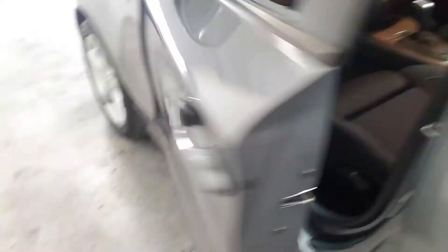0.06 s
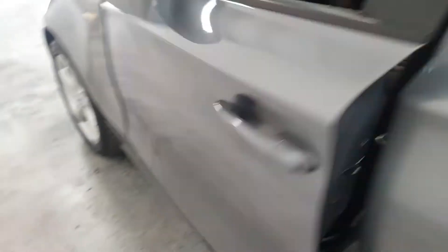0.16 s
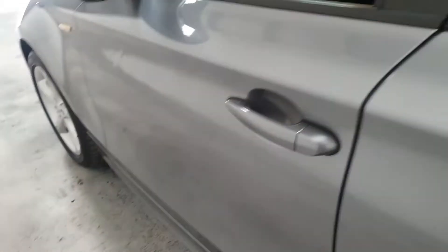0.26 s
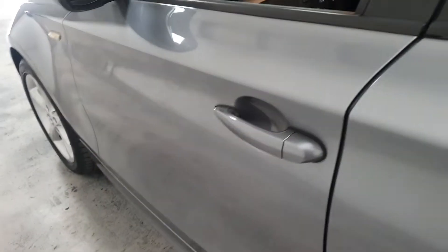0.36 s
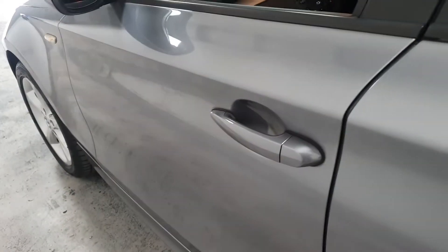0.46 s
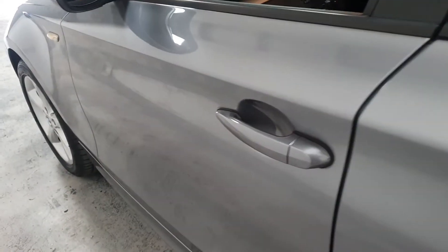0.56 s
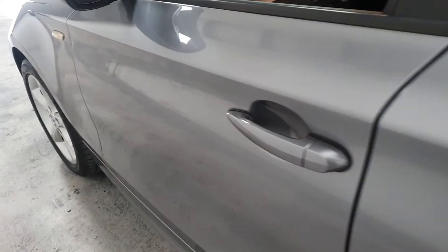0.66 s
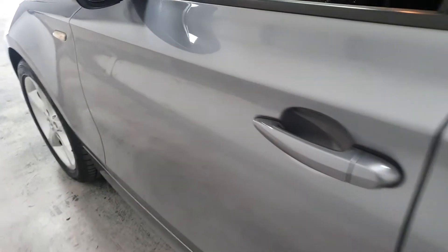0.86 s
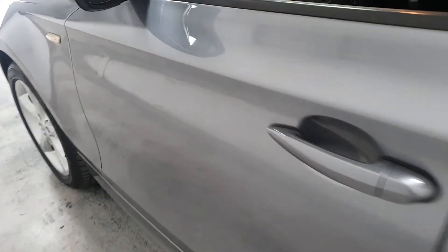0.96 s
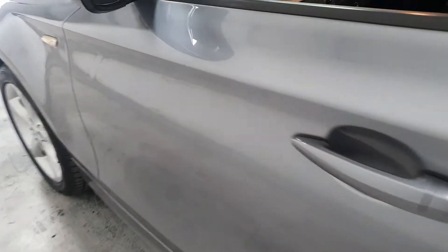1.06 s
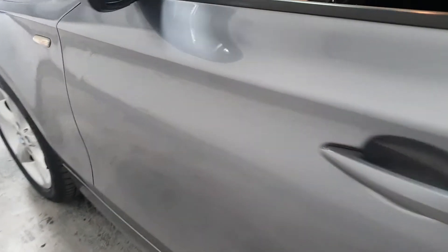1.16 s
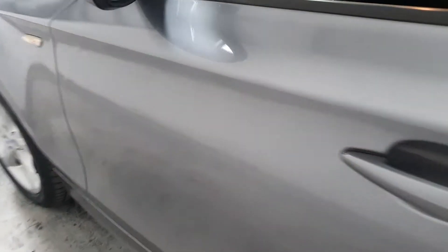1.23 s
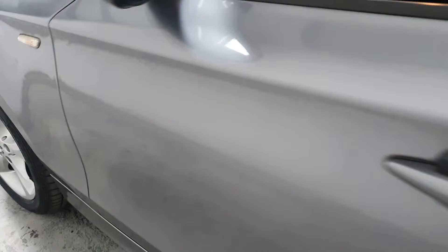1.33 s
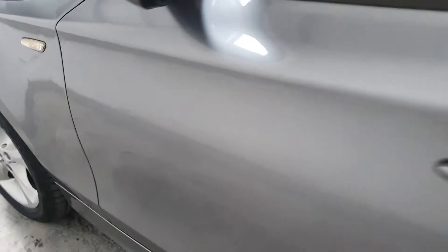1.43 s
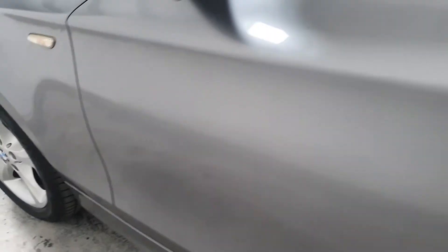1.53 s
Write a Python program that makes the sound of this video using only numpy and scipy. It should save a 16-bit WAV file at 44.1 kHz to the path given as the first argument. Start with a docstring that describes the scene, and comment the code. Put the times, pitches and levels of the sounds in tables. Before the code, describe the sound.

A car door slams shut with a solid metallic thunk, echoing through a bare garage

```python
"""Car door slammed in an echoing garage

A car door is swung shut in a bare garage, an arm's length from a hand-held microphone.
Shaped noise makes the rushing scuff of the swing; short ringing tones and noise bursts make the latch clack.
Slower tones and noise make the door boom, shudder and rattle, and fading noise bands make the hall ring out.
Underneath are a faint wavering hum, rumble and hiss, with soft handling knocks and a sleeve rustle."""
import sys
import numpy as np
from scipy import signal
from scipy.fft import rfft, irfft
from scipy.io import wavfile
from scipy.ndimage import uniform_filter1d

SR = 44100
rng = np.random.default_rng(int(sys.argv[2]) if len(sys.argv) > 2 else 0)


def output_pcm(signal):
    """Save a mono or channel-first signal as 16-bit PCM at the path in sys.argv[1].

    Samples are clipped to [-1, 1] before scaling.
    """
    pcm = np.clip(np.atleast_2d(signal).T, -1, 1) * 32767
    wavfile.write(sys.argv[1], SR, np.round(pcm).astype(np.int16))


N = 68355  # length in samples


def undb(db):
    """Turn decibels into a gain."""
    return 10 ** (np.asarray(db) / 20)


def clock():
    """Time of every sample, in seconds."""
    return np.arange(N) / SR


def unit(x):
    """Scale a sound to an rms of 1."""
    return x / np.sqrt(np.mean(x ** 2))


def fade(start, t60):
    """Start suddenly, then die away exponentially, falling 60 dB in t60 seconds."""
    age = clock() - start
    return (age >= 0) * np.exp(-np.log(1000) * np.maximum(age, 0) / t60)


def grow(start, build_s):
    """Rise from 0 towards 1, quickly at first and then ever more slowly."""
    return 1 - np.exp(-np.maximum(clock() - start, 0) / build_s)


def curve(points):
    """Gain that follows points of (seconds, dB)."""
    seconds, db = np.array(points).T
    return undb(np.interp(clock(), seconds, db))


def freqs():
    """Frequency of every spectral bin in Hz, kept at 1 or more so logarithms work."""
    return np.maximum(np.arange(N // 2 + 1) * SR / N, 1)


def colour(x, points):
    """Shape the spectrum of noise with points of (Hz, dB), then scale it to an rms of 1."""
    hz, db = np.array(points).T
    gain = undb(np.interp(np.log(freqs()), np.log(hz), db))
    return unit(irfft(rfft(x) * gain, N))


BASS_LIKENESS, ALIKE_HZ = 0.992, 800  # how alike left and right are in the bass; where this fades
TREBLE_HZ, TREBLE_PAN_DB = 4500, -1  # around this pitch the sound leans right (minus means right)


def diffuse():
    """Stereo noise from all around: left and right agree in the bass and differ in the treble."""
    mid, side = rfft(rng.standard_normal((2, N)))
    alike = BASS_LIKENESS / (1 + (freqs() / ALIKE_HZ) ** 2)
    lean_db = TREBLE_PAN_DB * np.exp(-np.log2(freqs() / TREBLE_HZ) ** 2)
    sign = np.array([[1], [-1]])  # left, right
    spectrum = mid * np.sqrt(1 + alike) + sign * side * np.sqrt(1 - alike)
    return unit(irfft(spectrum * undb(sign * lean_db / 2), N))


def gritty(grain_db, size=24):
    """Diffuse noise broken into tiny grains, each "size" samples long, of uneven strength."""
    noise = diffuse()
    grains = undb(grain_db * rng.standard_normal(N // size + 1))
    return noise * np.repeat(grains, size)[:N]


def ring(modes, start, flip=1):
    """Fading tones struck at one moment; with flip -1 neighbours swing in opposite directions."""
    out = 0
    for k, (hz, db, t60) in enumerate(modes):
        tone = np.sin(2 * np.pi * hz * (clock() - start))
        out = out + flip ** k * undb(db) * fade(start, t60) * tone
    return out


def convolve(x, response):
    """Pass stereo sound through a response."""
    return signal.fftconvolve(x, response, axes=1)[:, :N]


# Background rumble level. Each row: time in seconds, level in dB.
FLOOR_LEVEL = [(1.2, -63), (1.4, -71), (1.55, -62)]
# Background rumble colour. Each row: frequency in Hz, relative level in dB.
FLOOR = [(25, -12), (60, 5), (110, -5.5), (250, -18.5), (500, -25), (900, -22), (1500, -35.5),
         (4000, -54.5)]
# Background hiss colour. Each row: frequency in Hz, relative level in dB.
HISS = [(500, 3), (2500, -3.5), (6500, -1.5), (8500, -10.5), (16000, -13.5)]
# Hum level. Each row: time in seconds, rms level in dB.
HUM_LEVEL = [(0, -64), (.9, -71), (1.15, -68.5), (1.4, -82), (1.55, -67)]
HISS_DB = -80.5
HUM_HZ, HUM_WAVER = 168, .025  # average pitch, and its typical drift as a fraction


def background():
    """Rumble and hiss are coloured noise; the hum is a sine whose pitch wavers at random."""
    waver = colour(rng.standard_normal(N), [(3, 2.5), (30, -50), (300, -120)])
    pitch_hz = HUM_HZ * (1 + HUM_WAVER * waver)
    hum = np.sqrt(2) * np.sin(2 * np.pi * np.cumsum(pitch_hz) / SR)
    rumble = curve(FLOOR_LEVEL) * colour(diffuse(), FLOOR)
    hiss = undb(HISS_DB) * colour(diffuse(), HISS)
    return rumble + hiss + hum * curve(HUM_LEVEL)


# Loudness of the swing's scuff. Each row: time in seconds, level in dB.
SCUFF_LEVEL = [(0, -27.5), (.03, -28.5), (.075, -27), (.1, -30), (.15, -36), (.21, -39), (.3, -88.5)]
# Colour of the swing's scuff. Each row: frequency in Hz, relative level in dB.
SCUFF = [(30, -6.5), (70, 10.5), (130, -15.5), (280, -15), (480, -9.5), (760, -9.5), (900, 1.5), (1100, -1),
         (1600, 1), (1950, 3.5), (2350, -4), (3500, -4), (6000, -9.5), (8200, -21.5), (15000, -25.5)]
SCUFF_GRAIN_DB = 0.5  # unevenness of the grains


def scuff():
    """Fine-grained rubbing noise that goes with the swing and dies as the door shuts."""
    return colour(gritty(SCUFF_GRAIN_DB), SCUFF) * curve(SCUFF_LEVEL)


# Echo bands of the garage.
# Each row: centre in Hz, relative level in dB, time to fall 60 dB in seconds (before the build-up).
HALL = [(40, -8, 0.95), (80, -7, .72), (160, -5, 0.56), (310, -2.5, 0.8357), (570, -3.5, 1.193),
        (1200, -6.5, 1.6), (2500, -8.5, 1.54), (4400, -9.5, 1.4), (6500, -8, 1.2), (9000, -8.5, 0.82),
        (14800, -11.5, 0.26)]
HALL_DELAY_S, HALL_BUILD_S = 0.017, 0.018  # wait before the echoes, and how gradually they build


def hall():
    """Response of the garage: dense echoes build up, then each band dies at its own rate."""
    noise, out = rfft(diffuse()), 0
    centres = np.log([row[0] for row in HALL])
    build = grow(HALL_DELAY_S, HALL_BUILD_S)
    for (hz, db, t60), pick in zip(HALL, np.eye(len(HALL))):
        shape = build * fade(0, t60)
        # Each band blends smoothly into its neighbours.
        band = irfft(noise * np.interp(np.log(freqs()), centres, pick), N)
        out = out + undb(db) * band * shape / np.sqrt(np.sum(shape ** 2))
    return out


# Strikes of the latch. Each row: start in seconds, relative level of ring and clack in dB,
# relative level of the crack in dB, left minus right in dB.
STRIKES = [(0.2187, -0.5, -28.5, -3), (0.2203, -1, -24, 0), (.2230, -2, -31, 4.5), (0.229, -18.5, -7, -8),
           (.2313, -12.5, 1, -6), (0.2354, -19.5, -10.5, 1), (0.2533, -22, -15, 0)]
# Ringing tones of the latch and door edge.
# Each row: frequency in Hz, relative level in dB, time to fall 60 dB in seconds.
LATCH_MODES = [(466, -17, 0.033), (657.3, -13.5, 0.017), (946.6, -22.5, 0.04), (1126.2, -16.5, 0.046),
               (1322, -13.5, .03), (1650, -8, 0.025), (2207, -15.5, 0.027), (2700.4, -11, 0.025),
               (3089, -11.5, .02), (4009.5, -0.5, 0.01464), (4650, -16.5, 0.0047)]
# The many weaker tones of the whole door, heard as one broad clack.
# Each row: frequency in Hz, relative level in dB.
CLACK = [(150, -2.5), (300, 8.5), (500, 6.5), (900, 1), (1500, -8), (2600, -3), (4300, -6), (5400, -13),
         (6500, -26.5), (9000, -43.5)]
# Metal-on-metal crack. Each row: frequency in Hz, relative level in dB.
CRACK = [(300, 1), (1200, 10), (3000, -4.5), (5000, -2.5), (6700, -3), (8000, -12.5), (12000, -14.5),
         (16000, -13)]
LATCH_DB, CLACK_DB, CRACK_DB = 0.5, -14, -14  # added to the strike levels
CLACK_T60_S, CRACK_T60_S = .018, .011
LEFT_LAG_S = .0001  # the latch ring and the body boom reach the left side later
LATCH_TOP_HZ = 5313  # the damped metal gives little above this
LEFT_SHADE_HZ = 2606  # the far side of the microphone hears the latch duller


def latch():
    """The claw hits the striker, snaps over and settles; each strike rings, clacks and cracks."""
    metal, clack, crack = 0, 0, 0
    broad, sharp = colour(diffuse(), CLACK), colour(diffuse(), CRACK)
    for s, ring_db, crack_db, pan_db in STRIKES:
        pan = undb(np.array([[pan_db], [-pan_db]]) / 2)
        tones = np.array([ring(LATCH_MODES, s + lag, flip=-1) for lag in (LEFT_LAG_S, 0)])
        metal = metal + pan * undb(LATCH_DB + ring_db) * tones
        clack = clack + pan * undb(CLACK_DB + ring_db) * broad * fade(s, CLACK_T60_S)
        crack = crack + pan * undb(CRACK_DB + crack_db) * sharp * fade(s, CRACK_T60_S)
    left = signal.lfilter(*signal.butter(1, LEFT_SHADE_HZ, fs=SR), metal[0])
    metal = np.array([left, metal[1]])
    soften = signal.butter(6, LATCH_TOP_HZ, fs=SR, output="sos")
    return signal.sosfilt(soften, metal), signal.sosfilt(soften, clack), crack


# Colour of the trim and window buzz. Each row: frequency in Hz, relative level in dB.
RATTLE = [(200, -2), (500, 9), (850, -3.5), (1300, -1.5), (2000, -3), (4300, -3.5), (6000, -13),
          (8000, -23.5), (16000, -25)]
RATTLE_S, RATTLE_DB = .257, -18.5  # moment and level of the strongest buzz
RATTLE_RISE_S, RATTLE_T60_S = 0.02, 0.17


def rattle():
    """Loose trim buzzes as grainy noise, from the first latch strike, most as the door bottoms out."""
    early = np.minimum(clock() - RATTLE_S, 0)
    shape = np.where(early < 0, np.exp(early / RATTLE_RISE_S), fade(RATTLE_S, RATTLE_T60_S))
    started = clock() > STRIKES[0][0]
    return undb(RATTLE_DB) * colour(gritty(grain_db=4.0), RATTLE) * shape * started


# The door pressing into its seals.
# Each row: middle of the push in seconds, relative level in dB, length of the push in seconds.
BLOWS = [(0.2346, -9.5, 0.0015), (0.2417, -4, 0.0031), (.2570, 2.5, 0.0041)]
# Booming tones of the door skin and cabin.
# Each row: frequency in Hz, relative level in dB, time to fall 60 dB in seconds.
BODY_MODES = [(55.23, -21, 0.46), (84.2, -3, 0.052), (121.35, -17.5, 0.079), (167.47, -11.5, 0.16),
              (208.4, -12, 0.12), (256.58, -17, 0.13), (311.5, -11.5, 0.16), (414.6, -17.5, 0.2),
              (489, -18.5, 0.37), (578, -18.5, .16), (654, -18, 0.16)]


def body():
    """Soft pushes of the rubber seals set the door skin and cabin booming."""
    out = 0
    for s, db, contact in BLOWS:
        # Half a sine: the push grows and lets go smoothly.
        push = np.sin(np.pi * np.minimum(clock() / contact, 1))
        boom = ring(BODY_MODES, s - contact / 2)
        out = out - undb(db) * signal.fftconvolve(boom, push / push.sum())[:N]
    left = np.interp(clock() - LEFT_LAG_S, clock(), out)
    return np.array([left, out])


# Dense low tones of the steel panels, as a noise colour. Each row: frequency in Hz, relative level in dB.
PANELS = [(60, -19.5), (150, 0), (220, -3), (310, 0.5), (480, -1), (680, -3.5), (850, -14.5), (2000, -35.5)]
PANEL_DB, PANEL_T60_S, PANEL_RISE_S = -23, 0.34, 0.0061


def panels():
    """The steel skin shudders, as low noise, from the first push on the seals."""
    start = BLOWS[0][0]
    shape = grow(start, PANEL_RISE_S) * fade(start, PANEL_T60_S)
    return undb(PANEL_DB) * colour(diffuse(), PANELS) * shape


# Soft knocks on the microphone. Each row: start in seconds, thump level in dB, tick level in dB.
KNOCKS = [(0.661, -42.5, -74), (.935, -41.5, -62), (1.165, -52, -54), (1.183, -52, -70.5),
          (1.274, -56.5, -76.5), (1.323, -53.5, -79)]
# Colour of their dull tick. Each row: frequency in Hz, relative level in dB.
TICK = [(150, -11), (700, 8.5), (1500, -10), (3000, -33), (8000, -43.5)]
# Loudness of a faint sleeve rustle. Each row: time in seconds, level in dB.
SLEEVE_LEVEL = [(1.3, -100), (1.35, -70.5), (1.385, -79.5), (1.415, -74.5), (1.46, -96)]
# Colour of the sleeve rustle. Each row: frequency in Hz, relative level in dB.
SLEEVE = [(300, -3.5), (1500, -1), (6500, 2), (8500, -13.5), (16000, -24)]
KNOCK_HZ, KNOCK_T60_S, TICK_T60_S = 59, 0.0759, 0.027


def handling():
    """A shifting hand makes low tones with faint noise ticks; a sleeve brushes past as noise."""
    thumps = sum(ring([(KNOCK_HZ, db, KNOCK_T60_S)], s) for s, db, _ in KNOCKS)
    touches = sum(undb(db) * fade(s, TICK_T60_S) for s, _, db in KNOCKS)
    ticks = colour(diffuse(), TICK) * uniform_filter1d(touches, size=128)  # softened starts
    sleeve = colour(diffuse(), SLEEVE) * curve(SLEEVE_LEVEL)
    return thumps + ticks + sleeve


# The whole door fills the hall; the latch itself is heard mostly close by.
CLACK_ROOM_DB, METAL_ROOM_DB, SCUFF_ROOM_DB = 7, -12.5, 3.5


def scene():
    """Door and scuff with their echoes, over the quiet garage."""
    metal, clack, crack = latch()
    slam = crack + body() + panels() + rattle()
    rush = scuff()
    # What each sound sends into the hall.
    radiated = slam + undb(METAL_ROOM_DB) * metal
    radiated = radiated + undb(CLACK_ROOM_DB) * clack + undb(SCUFF_ROOM_DB) * rush
    direct = metal + clack + slam + rush
    return direct + convolve(radiated, hall()) + handling() + background()


SUPPRESS_BELOW_DB, SUPPRESS_KNEE_DB = -61.5, 4.5  # what counts as faint, and how gradually
SUPPRESS_DEPTH_DB, SUPPRESS_FROM_HZ = 4.5, 400


def suppress(x):
    """Noise suppression: above the bass, faint sound is turned down a little."""
    high_pass = signal.butter(2, SUPPRESS_FROM_HZ, "high", fs=SR, output="sos")
    upper = signal.sosfiltfilt(high_pass, x)
    power = np.abs(uniform_filter1d(np.mean(upper ** 2, axis=0), size=2048))
    level_db = 10 * np.log10(power + 1e-14)
    faint = (1 + np.tanh((SUPPRESS_BELOW_DB - level_db) / SUPPRESS_KNEE_DB / 2)) / 2  # 0 to 1
    return x - upper * (1 - undb(-SUPPRESS_DEPTH_DB * faint))


LOW_CUT_HZ, TOP_HZ = 43, 15800


def record(dry):
    """The recorder drops the deepest bass, dims faint noise, rounds the highest peaks and cuts the top."""
    low_cut = signal.butter(2, LOW_CUT_HZ, "high", fs=SR, output="sos")
    cleaned = suppress(signal.sosfilt(low_cut, dry))
    rounded = cleaned / (1 + cleaned ** 6) ** (1 / 6)
    top_cut = signal.ellip(10, .1, 80, TOP_HZ, fs=SR, output="sos")
    return signal.sosfilt(top_cut, rounded)


dry = scene()
out = record(dry)
output_pcm(out)
```